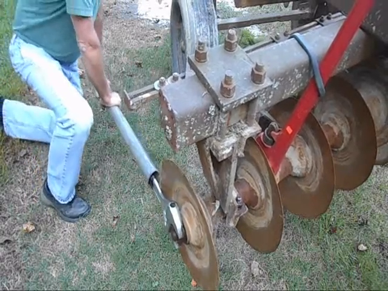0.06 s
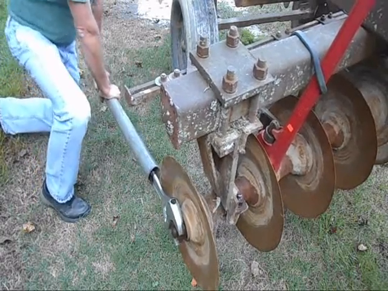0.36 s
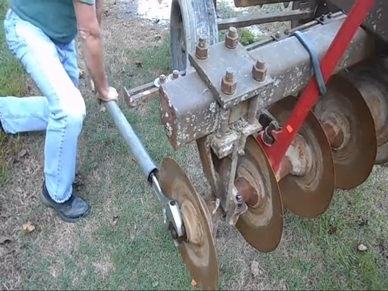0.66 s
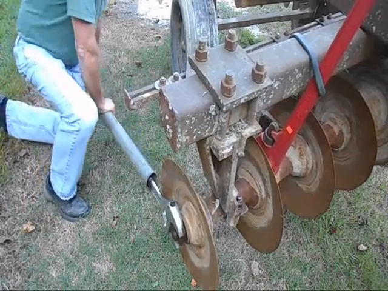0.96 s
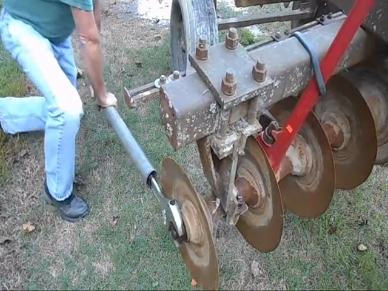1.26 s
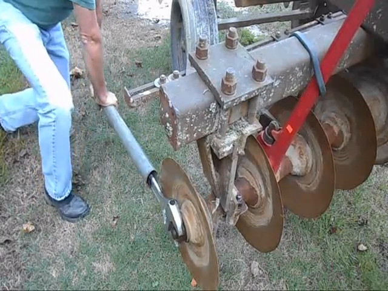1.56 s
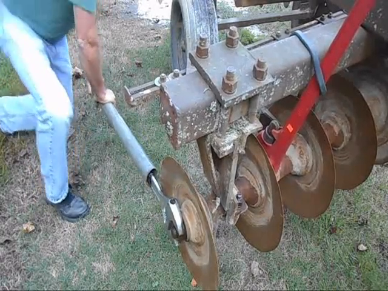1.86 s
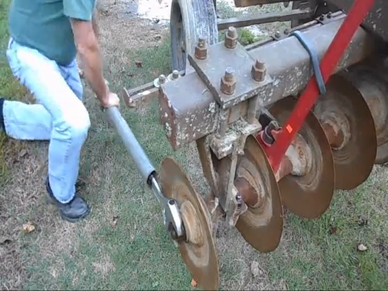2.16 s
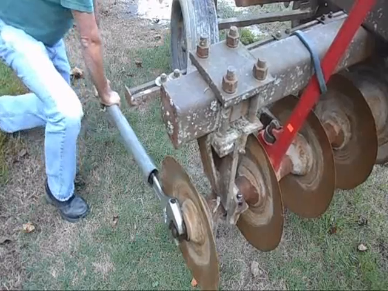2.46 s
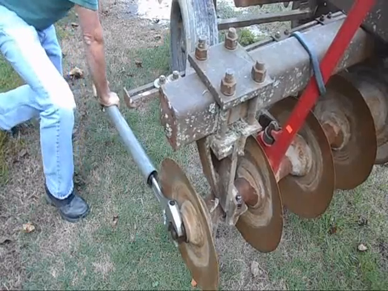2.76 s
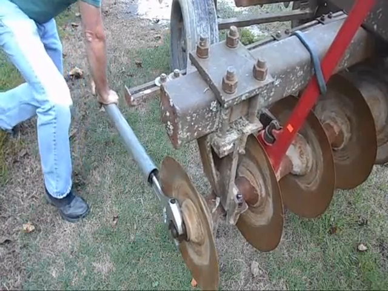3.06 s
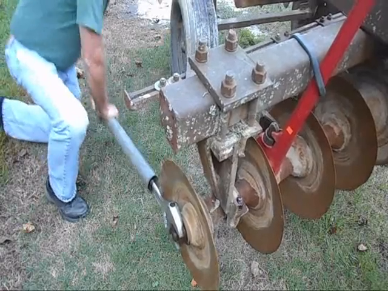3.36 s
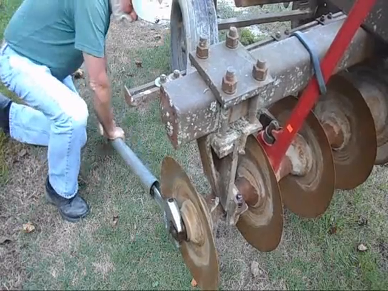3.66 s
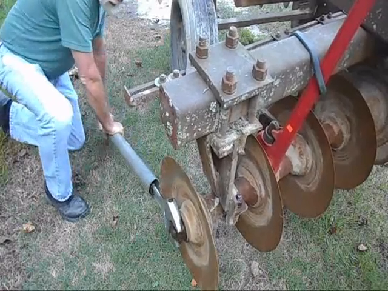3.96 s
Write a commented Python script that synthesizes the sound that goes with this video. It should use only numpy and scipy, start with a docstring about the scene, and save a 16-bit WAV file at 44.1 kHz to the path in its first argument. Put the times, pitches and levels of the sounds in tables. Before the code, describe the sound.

Short, gritty metal creaks come in four bouts as a lever works a rusted bolt on a farm implement outdoors. The steel rings slightly amid scraping, ticks and knocks, with a steady hiss and faint insects behind.

```python
"""Short gritty creaks ring steel: a long pipe on a wrench strains the rusted bolt of a disc harrow.
Each heave makes the rust give in runs of stick-slip jerks, with dry scraping and one squeak.
Rust flakes snap in sharp ticks and the lever knocks in its play.
Behind it, insects shrill over a steady outdoor hiss.
The recorder runs at half rate and holds each sample, which mirrors the treble."""
import sys
import numpy as np
from scipy import signal
from scipy.fft import rfft, irfft
from scipy.io import wavfile

SR = 44100
rng = np.random.default_rng(int(sys.argv[2]) if len(sys.argv) > 2 else 0)


def dump(signal):
    """Clip the signal to [-1, 1] and save it as 16-bit WAV at the path in sys.argv[1]."""
    limited = np.clip(np.atleast_2d(signal).T, -1, 1)
    pcm = np.round(limited * 32767).astype(np.int16)
    wavfile.write(sys.argv[1], SR, pcm)


N = 176400
T = np.arange(N) / SR


def from_db(db):
    """Decibels to gain."""
    return 10 ** (np.asarray(db) / 20)


def unit_rms(x):
    """Scale to an rms of one."""
    return x / np.sqrt(np.mean(x ** 2) + 1e-20)


def colour(x, spectrum):
    """Filter by (freq_hz, gain_db) points joined over log frequency."""
    freq_hz, gain_db = np.transpose(spectrum)
    bins_hz = np.maximum(np.arange(N + 1) * SR / (2 * N), 1)
    curve_db = np.interp(np.log(bins_hz), np.log(freq_hz), gain_db)
    return irfft(rfft(x, 2 * N) * from_db(curve_db))[:N]


def band(x, low_hz, high_hz, order=2):
    """Causal band-pass."""
    edges_hz = [low_hz, np.clip(high_hz, low_hz * 1.1, SR * .45)]
    return signal.sosfilt(signal.butter(order, edges_hz, "band", fs=SR, output="sos"), x + 1e-18)


def drift(cutoff_hz):
    """Low-passed random wander, unit rms."""
    lowpass = signal.butter(2, cutoff_hz, fs=SR, output="sos")
    return unit_rms(signal.sosfilt(lowpass, rng.standard_normal(N + SR))[SR:])


def envelope(start_s, attack_s, hold_s, t60_s):
    """Linear attack; exponential fade from hold_s after the start."""
    age_s = T - start_s
    return np.clip(age_s / attack_s, 0, 1) * from_db(-60 * np.clip((age_s - hold_s) / t60_s, 0, 3))


def slips(rate_per_s, spread_db=2.14):
    """Tiny stick-slip jerks of uneven size at random moments, unit rms."""
    sizes = from_db(spread_db * np.minimum(rng.exponential(1, N), 4))
    signs = rng.choice([-1, 1], N)
    slipping = rng.random(N) < rate_per_s / SR
    return unit_rms(sizes * signs * slipping)


# Outdoor hiss spectrum: freq_hz, density_db
AIR_SPECTRUM = [(25, -23), (55, -14), (82, -9), (105, -13), (145, -11.5), (220, -15), (480, -9.5),
                (550, -5), (850, -3.5), (1000, -1.5), (1110, 2), (1250, -1.5), (1550, 1), (2200, -3),
                (2750, -5), (3200, -8.5), (3350, -6), (3550, -9.5), (4500, -14), (6500, -18.5),
                (10000, -26)]


def air(level_db=-53, waver_db=.4):
    """Steady outdoor hiss, wavering slightly."""
    gain = from_db(level_db + waver_db * drift(cutoff_hz=6.1))
    return gain * unit_rms(colour(rng.standard_normal(N), AIR_SPECTRUM))


# Insect chorus spectrum: freq_hz, density_db
INSECT_SPECTRUM = [(6700, -18), (7350, -5.5), (7520, -1), (7650, 1), (7900, -0.5), (8100, 0.5), (8190, 1.5),
                   (8280, -1.5), (8450, -9), (9200, -33.5)]


def insects(level_db=-60.5, throb_db=0.77):
    """Shrill chorus: a narrow noise band with a fast, irregular throb."""
    gain = from_db(level_db + throb_db * drift(cutoff_hz=70))
    return gain * unit_rms(colour(rng.standard_normal(N), INSECT_SPECTRUM))


def yard_scatter(x, gain_db=-13.5):
    """Faint dull reflections from the machine and its surroundings."""
    tail = band(rng.standard_normal(N), low_hz=250, high_hz=2650, order=1)
    tail *= envelope(start_s=0.007, attack_s=0.0028, hold_s=0, t60_s=.3)
    tail /= np.sqrt(np.sum(tail ** 2))
    return from_db(gain_db) * signal.fftconvolve(x, tail)[:N]


# Modes of lever and frame: pitch_hz, gain_db, t60_s
STEEL_MODES = [(609, 2.5, 0.034), (1200, -6, 0.11), (1342, -3, 0.088), (1490, -4.5, 0.067),
               (1850, -2, 0.14), (2140, -11, 0.088), (2447, -1.5, 0.11), (2786, -3.5, 0.064),
               (3150, 0, 0.11), (3455, 3.5, 0.062), (4000, -16, 0.36), (4640, 6, 0.22), (5206, -2, .09),
               (6500, -5, 0.12)]


def steel_ring(force):
    """Lever and frame ring under a contact force, one damped resonator per mode."""
    ring = np.zeros(N)
    for pitch_hz, gain_db, t60_s in STEEL_MODES:
        radius = from_db(-60 / (t60_s * SR))
        feedforward = [1 - radius ** 2, 0, radius ** 2 - 1]
        feedback = [1, -2 * radius * np.cos(2 * np.pi * pitch_hz / SR), radius ** 2]
        ring += from_db(gain_db) * signal.lfilter(feedforward, feedback, force + 1e-18)
    return ring


# Scrape contours, one list per stroke: time_s, level_db
SCRAPE_CONTOURS = [
    [(.08, -70), (.13, -50), (.18, -55), (.3, -63.5)],
    [(.85, -55.5), (.9, -56), (.95, -50.5), (1.03, -53), (1.1, -58), (1.25, -59)],
    [(2.03, -67), (2.09, -49), (2.17, -56.5), (2.3, -58.5), (2.42, -66)],
    [(3.41, -64), (3.475, -49), (3.55, -45.5), (3.615, -51), (3.69, -50.5), (3.8, -56.5), (3.87, -62),
     (3.905, -55), (3.99, -57.5)],
]
# Scrape spectra, one list per stroke: freq_hz, gain_db
SCRAPE_SPECTRA = [
    [(150, -17), (500, -0.5), (2000, -7), (4500, -2), (7000, -5), (10000, -16)],
    [(150, -8), (600, -5), (2000, 4.5), (4500, -2), (7000, -2.5), (10000, -19)],
    [(150, -12), (600, 5), (2000, 8.5), (4500, 3), (7000, 1), (10000, -16)],
    [(60, -27), (160, -6.5), (230, -15.5), (350, -7), (650, -1.5), (2000, -0.5), (4500, -5.5), (7000, -10),
     (10000, -21.5)],
]


def scrapes(patchy_db=3.0, ring_db=-26):
    """The lever shifts: dense dry grains catch unevenly and ring the steel a little."""
    friction = np.zeros(N)
    for contour, spectrum in zip(SCRAPE_CONTOURS, SCRAPE_SPECTRA):
        time_s, level_db = np.transpose(contour)
        stroke_db = np.interp(T, time_s, level_db, left=-120, right=-120)
        catch_db = patchy_db * drift(cutoff_hz=58)
        grains = unit_rms(colour(slips(rate_per_s=5200), spectrum))
        friction += from_db(stroke_db + catch_db) * grains
    return friction + from_db(ring_db) * steel_ring(friction)


def squeak(pitch_hz=1116, level_db=-39):
    """The bolt sings for a moment on one note."""
    tone = np.sin(2 * np.pi * pitch_hz * T)
    return from_db(level_db) * tone * envelope(start_s=1.045, attack_s=0.008, hold_s=0.016, t60_s=.035)


# Rust flake snaps: start_s, gain_db, low_hz, high_hz
FLAKE_SNAPS = [(.22, -21, 1500, 3900), (.87, -31, 3000, 9000), (2.0757, -16, 3200, 9500),
               (3.0, -33, 4000, 7000), (3.9248, -18, 5500, 7700)]


def ticks(tail_db=-19):
    """Hard rust flakes snap: each an impulse with a brief gritty tail."""
    out = np.zeros(N)
    for start_s, gain_db, low_hz, high_hz in FLAKE_SNAPS:
        fade = envelope(start_s, attack_s=1 / SR, hold_s=0, t60_s=.016)
        snap = from_db(tail_db) * rng.standard_normal(N) * fade
        snap[int(start_s * SR)] += 2
        out += from_db(gain_db) * band(snap, low_hz, high_hz)
    return out


BURST_ATTACK_S = 0.00084


def slip_bursts(bursts, rate_per_s=7000, spill_db=-25.5):
    """Short runs of slips, each strongest in its own band, with a faint broadband spill."""
    force = np.zeros(N)
    for start_s, hold_s, t60_s, gain_db, low_hz, high_hz in bursts:
        grit = unit_rms(band(slips(rate_per_s), low_hz, high_hz))
        spill = unit_rms(band(slips(rate_per_s), low_hz=390, high_hz=5800, order=1))
        gain = from_db(gain_db) * envelope(start_s, BURST_ATTACK_S, hold_s, t60_s)
        force += gain * (grit + from_db(spill_db) * spill)
    return force


# Lever knocks: start_s, hold_s, t60_s, gain_db, low_hz, high_hz
LEVER_KNOCKS = [(0.702, .003, 0.06, -49.5, 700, 1900), (0.824, 0.01, 0.058, -52.5, 705, 1500),
                (2.343, 0.002, 0.034, -45.5, 600, 1960), (2.437, 0.018, 0.064, -46.5, 590, 1600),
                (3.627, 0.0057, 0.073, -32.5, 790, 3200), (3.638, 0.0061, 0.045, -37, 910, 2520),
                (3.9, 0.0071, .04, -50, 700, 2190)]


def knocks(strike_boost_db=29):
    """The lever knocks in its play: a hard contact pings the high modes, then the parts chatter."""
    strikes = np.zeros(N)
    for start_s, _, _, gain_db, _, _ in LEVER_KNOCKS:
        strikes[int((start_s + BURST_ATTACK_S) * SR)] = from_db(gain_db + strike_boost_db)
    contact = band(strikes, low_hz=4400, high_hz=5600, order=1)
    chatter = slip_bursts(LEVER_KNOCKS)
    return chatter + steel_ring(contact + chatter)


# Rust giving way: start_s, hold_s, t60_s, gain_db, low_hz, high_hz
RUST_CREAKS = [(.1125, 0.003, 0.019, -44.5, 990, 3500), (.1245, 0.009, .07, -36.5, 1270, 4500),
               (.152, 0.017, 0.25, -49, 1390, 5050), (.457, 0.0048, .04, -45, 1900, 3880),
               (.473, .003, 0.11, -47, 1090, 2200), (.958, .014, 0.13, -43, 2300, 6170),
               (1.043, 0.0094, 0.043, -42.5, 650, 3400), (2.093, 0.0088, 0.073, -39, 1900, 5140),
               (2.1305, 0.0084, 0.039, -41.5, 1200, 3350), (2.215, 0.028, .05, -49, 1970, 2680),
               (3.421, 0.0064, 0.025, -48.5, 3900, 4670), (3.528, 0.029, .1, -42, 1450, 5000),
               (3.703, 0.023, 0.14, -50.5, 900, 2920)]


def creaks():
    """The rust gives in gritty bursts, heard directly and through the ringing steel."""
    grit = slip_bursts(RUST_CREAKS)
    return grit + steel_ring(grit)


def scene():
    """The straining bolt and its reflections over hiss and insects, mono."""
    bolt = scrapes() + from_db(-3.5) * (creaks() + knocks()) + from_db(-3) * ticks()
    return (bolt + yard_scatter(bolt) + squeak() + air() + insects())[None]


# Recorder response: freq_hz, gain_db
RECORDER_RESPONSE = [(20, 0.5), (8100, 1), (8600, -1), (9400, -2), (10200, -4.5), (10700, -36)]


def record(dry):
    """Half-rate recorder: holding every second sample mirrors the treble; then the top is cut."""
    half_rate = colour(dry[0], RECORDER_RESPONSE)[::2]
    held = np.repeat(half_rate, 2)[:N]
    cutoff_hz = 15800
    lowpass = signal.ellip(10, .1, 70, cutoff_hz, fs=SR, output="sos")
    return signal.sosfilt(lowpass, held)[None]


dry = scene()
out = record(dry)
dump(out)
```